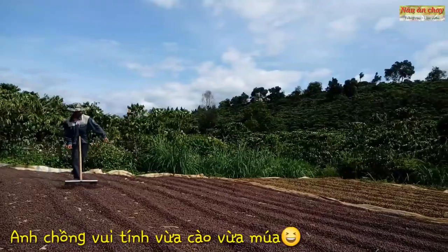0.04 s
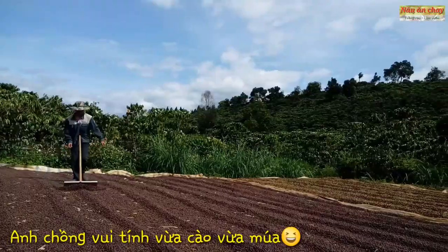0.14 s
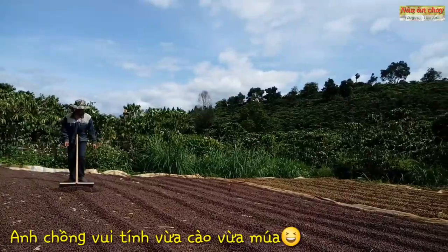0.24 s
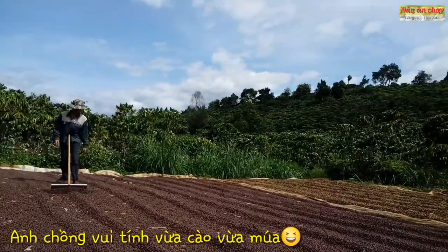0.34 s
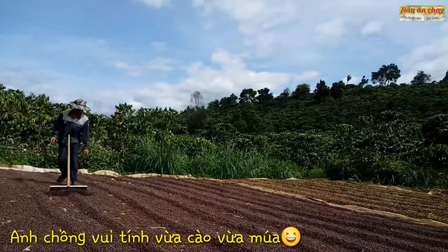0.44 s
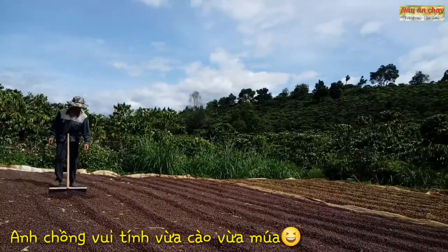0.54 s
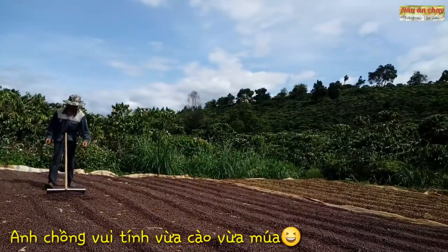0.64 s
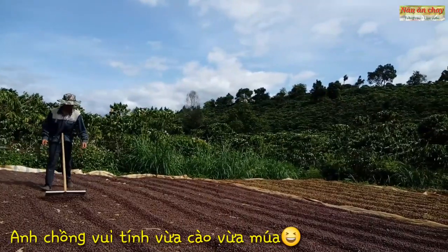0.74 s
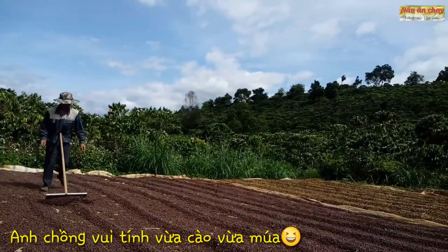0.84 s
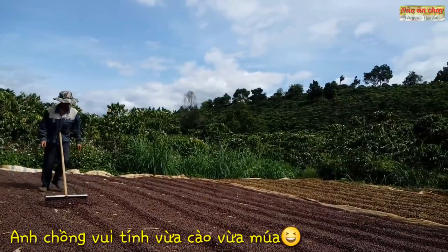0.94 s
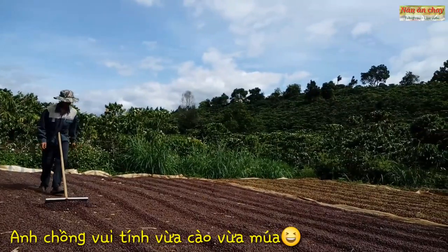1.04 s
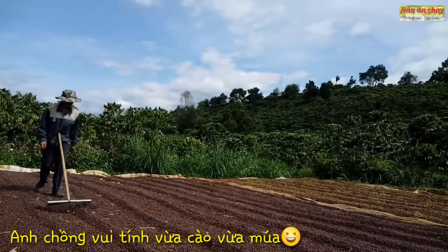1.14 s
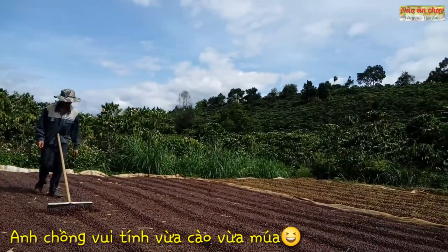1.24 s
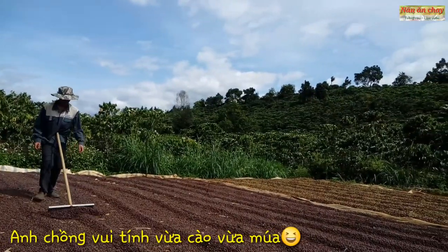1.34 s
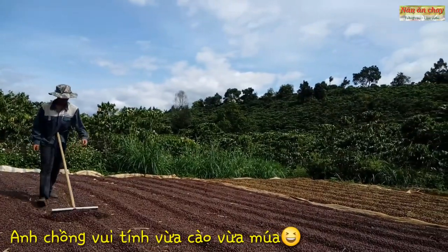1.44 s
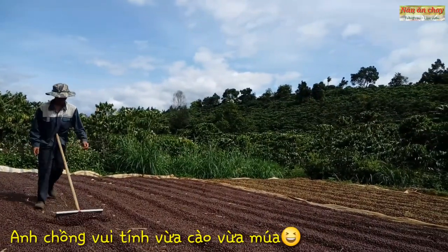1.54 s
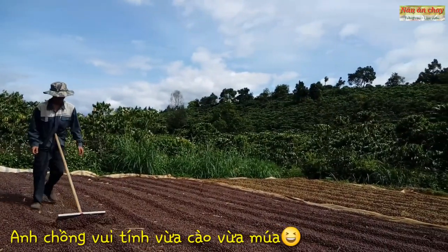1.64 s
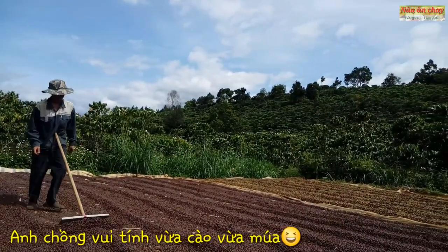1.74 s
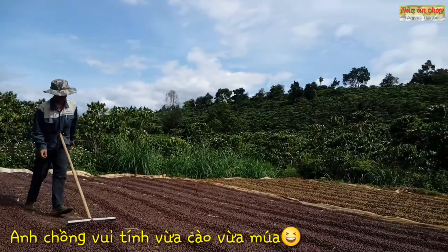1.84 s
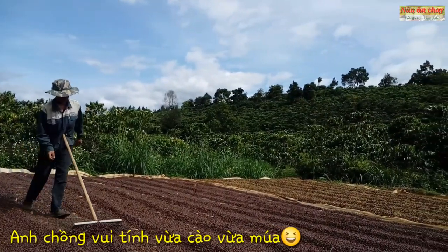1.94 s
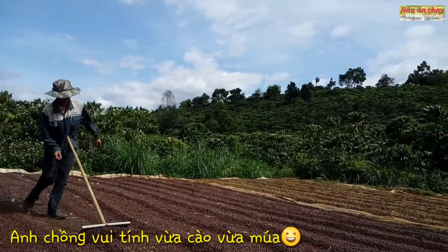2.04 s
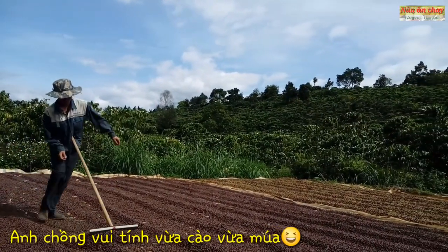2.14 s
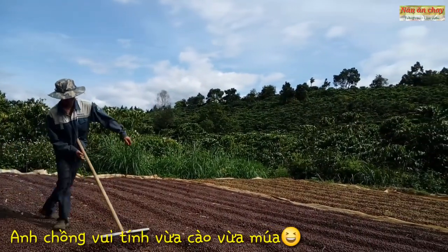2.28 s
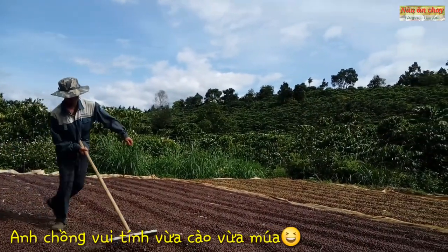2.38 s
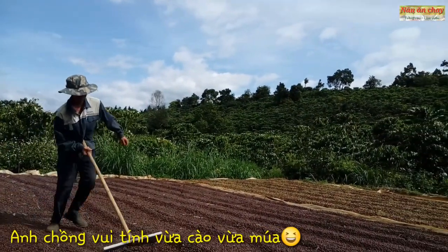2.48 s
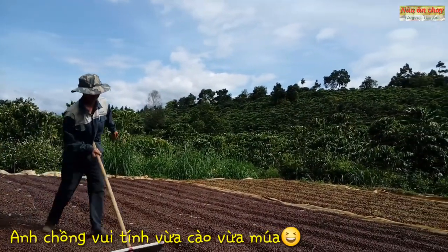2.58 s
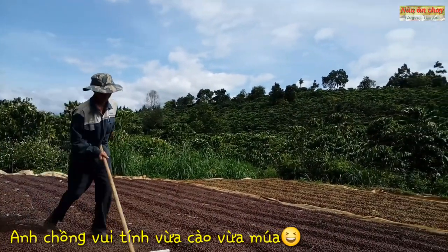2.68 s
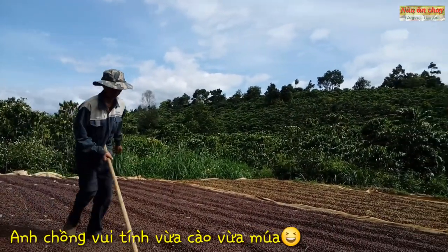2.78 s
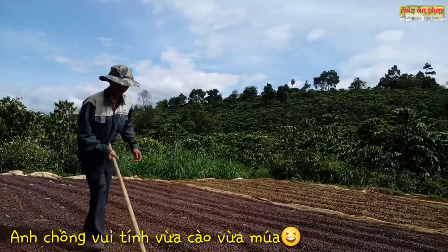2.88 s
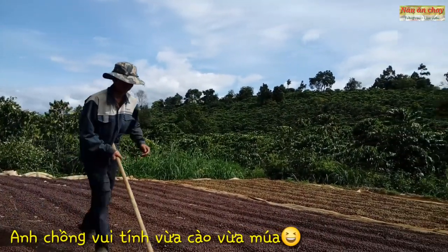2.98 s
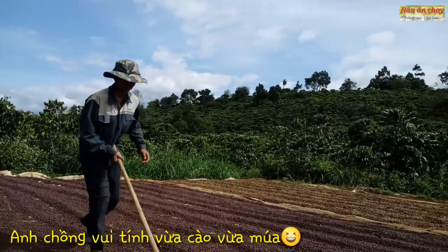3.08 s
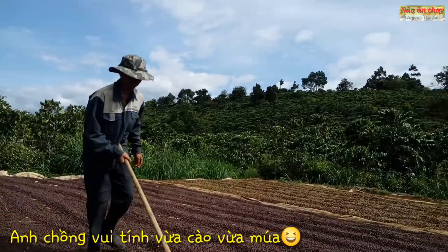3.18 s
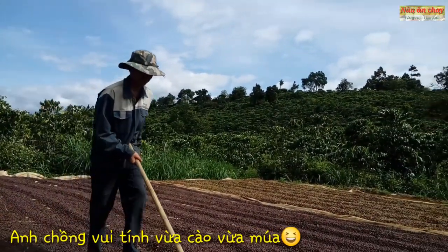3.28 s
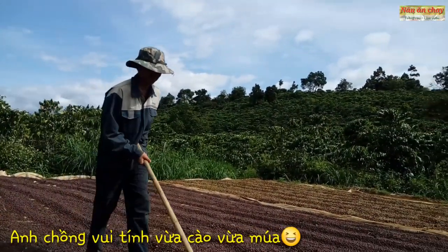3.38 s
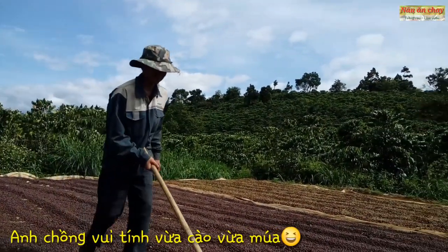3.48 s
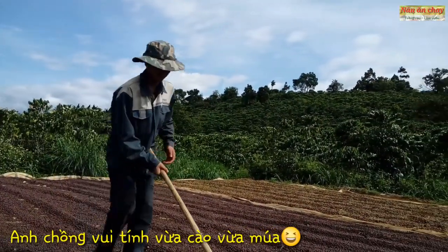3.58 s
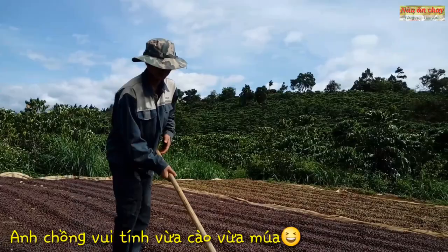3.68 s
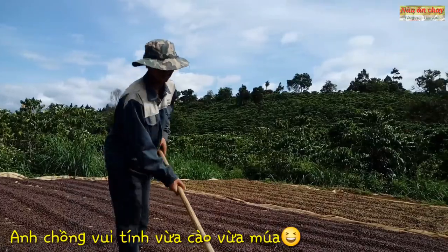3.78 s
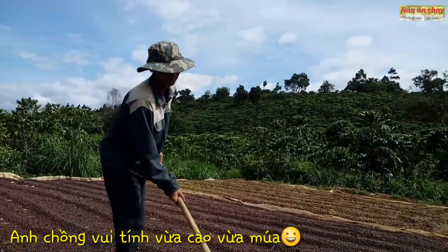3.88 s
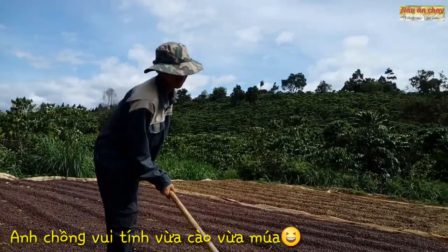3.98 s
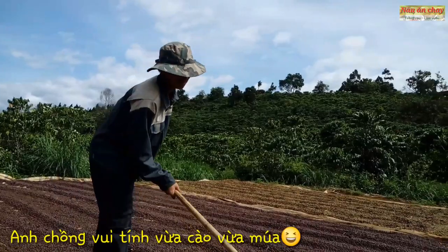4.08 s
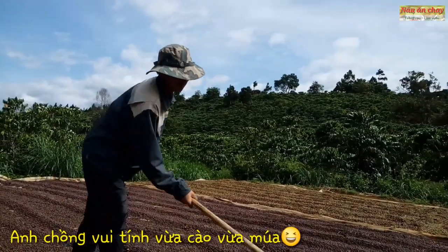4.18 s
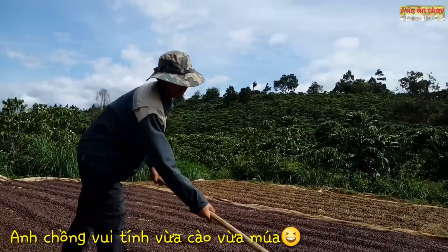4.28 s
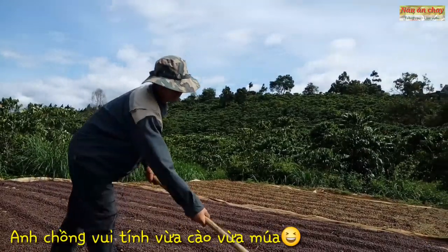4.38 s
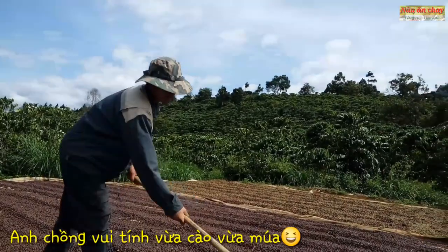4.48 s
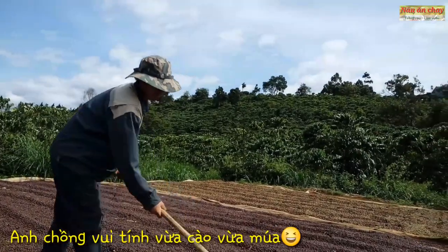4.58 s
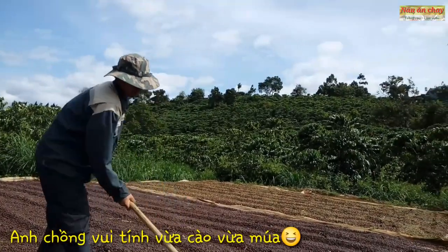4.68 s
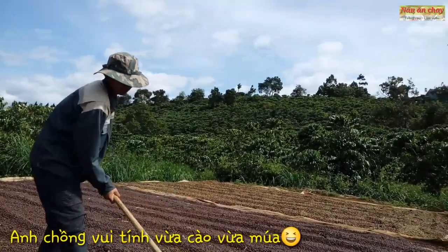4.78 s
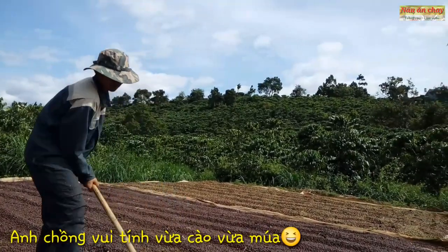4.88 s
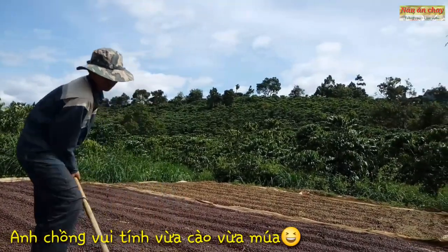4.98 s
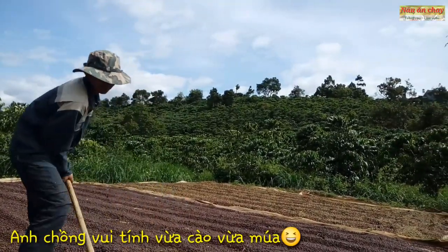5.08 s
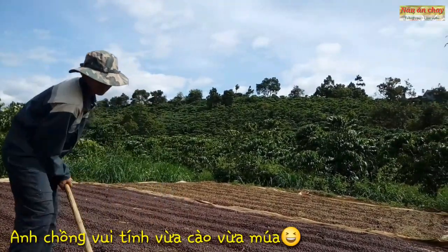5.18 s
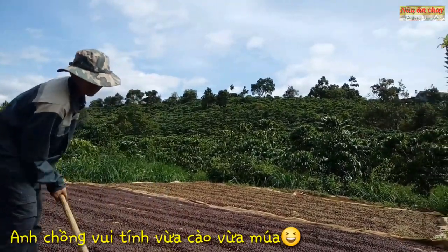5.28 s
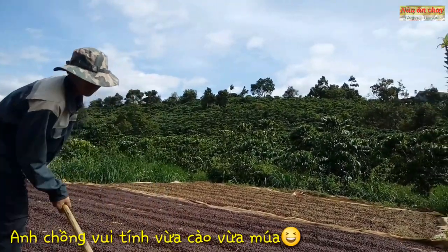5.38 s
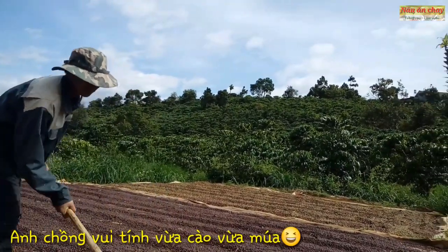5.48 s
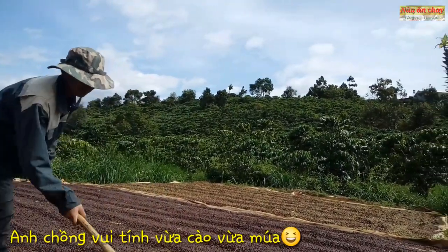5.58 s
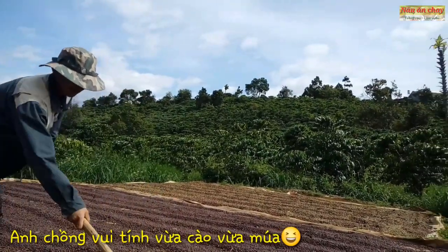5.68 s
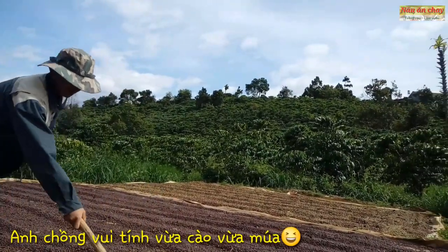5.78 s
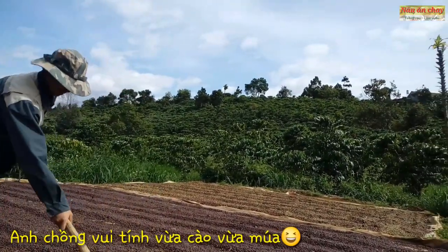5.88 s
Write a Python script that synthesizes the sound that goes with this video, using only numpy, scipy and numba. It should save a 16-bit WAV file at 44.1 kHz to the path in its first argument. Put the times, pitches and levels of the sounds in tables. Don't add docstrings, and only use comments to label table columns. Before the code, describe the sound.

One long rattling scrape of hard, dry shells approaches over nearly four seconds, uneven with each pull. Loose shells tick as they settle, there is a brief lull with a low wind thump, then the rake touches down and makes two short strokes and a final swelling one. Open air, phone-like microphone, quiet leaves and distant hum, no reverberation.

```python
import sys
import numpy as np
from scipy import signal
from scipy.fft import rfft, irfft
from scipy.io import wavfile
from scipy.ndimage import uniform_filter1d
from numba import njit

SR = 44100
rng = np.random.default_rng(int(sys.argv[2]) if len(sys.argv) > 2 else 0)


def wav_out(sig):
    wavfile.write(sys.argv[1], SR, np.round(np.clip(np.atleast_2d(sig).T, -1, 1) * 32767).astype(np.int16))


def how_loud(loudness_db):
    steps = np.asarray(loudness_db, float) / 20
    return 10 ** steps


N = 261513

# [f/Hz, level/dB per Hz]
FARM_SPECTRUM = [(59, -62), (100, -19), (129, -23), (305, -16), (445, -5), (549, -7), (1440, -6.5),
                 (1670, -11), (2390, -6), (7140, -26), (15200, -19)]
FARM_DB = -58
# [f/Hz, level/dB per Hz]
WIND_SPECTRUM = [(8.8, -44), (15, -9.5), (64, 5.5), (123, -2.5), (167, -15.5), (212, -20), (260, -9.5),
                 (340, -42), (570, -120)]
# [t/s, peak level/dB, length/s]
GUSTS = [(.07, -51, .04), (0.181, -37, 0.021), (0.294, -50, .03), (.4, -50, 0.023), (0.526, -38.5, 0.066),
         (.75, -45, .1), (0.893, -32.5, 0.079), (1.07, -35, 0.043), (1.203, -41, 0.034),
         (1.365, -43, 0.027), (1.45, -40, 0.027), (1.6, -39, 0.08), (1.773, -40.5, .06),
         (1.972, -53, 0.042), (2.114, -55, .04), (2.397, -44, 0.046), (2.558, -36, .025), (2.72, -52, .06),
         (2.872, -36.5, 0.02), (2.984, -35.5, 0.048), (3.1, -30, 0.021), (3.21, -40, .04),
         (3.332, -55, 0.072), (3.58, -58, 0.033), (3.725, -49, .03), (4.236, -43, 0.026),
         (4.295, -49, 0.028), (4.568, -54, .02), (5.55, -61, .1), (5.907, -63, .04)]
LULL_DB = -66
# [t/s, peak level/dB, f/Hz]
THUMPS = [
    (0.42, -30, 110),
    (2.8, -44, 90),
    (4.175, -45, 75),
    (4.228, -32, 122),
    (4.223, -34, 210),
    (3.7, -45, 62),
    (4.262, -62, 250),
]
# [t/s, length/s, f/Hz, rise/Hz per s, level/dB]
SQUEAKS = [
    (4.13, 0.15, 2435, 486, -57.5),
    (5.7, 0.164, 2300, 130, -47),
    (5.66, 0.15, 1190, 50, -40),
]
SQUEAK_ATTACK_S, SQUEAK_FADE_DB_PER_S = 0.014, 300

# [t/s, peak level/dB, f/Hz, ring/s, share of rustle/0-1]
SETTLING = [(3.730, -21, 4300, 0.0011, 1), (3.9655, -25, 2570, 0.0033, .9), (4.0, -37, 1410, 0.024, 0.2),
            (4.014, -38, 2700, .006, .6), (4.022, -32, 3440, .008, .6), (4.04, -54, 7500, .01, .2),
            (4.060, -46, 5230, 0.034, .6), (4.061, -47, 6500, 0.02, .3), (4.062, -50, 7600, .015, .3),
            (4.063, -41, 2900, .006, .5), (4.095, -43, 3560, 0.036, .3), (4.123, -37, 2000, .003, .9),
            (4.135, -38, 3620, .004, 0.7), (4.155, -45, 3480, 0.018, .2), (4.145, -44, 4300, .006, .6),
            (4.165, -57, 5600, 0.013, .3), (4.175, -52, 5300, 0.005, .6), (4.184, -51, 8500, .0015, .5),
            (4.191, -47, 8300, .0015, .5), (4.199, -53, 8000, .0015, .8), (4.236, -60, 5000, .002, .8)]
# [t/s, peak level/dB, f/Hz, ring/s, share of rustle/0-1]
TOUCH = [
    (4.4762, -21, 3770, 0.0014, 0.31),
    (4.4768, -33, 2920, .0015, .7),
    (4.4772, -32, 2100, .0015, .9),
    (4.486, -45, 3600, 0.013, .9),
]

# [lands t/s, slows t/s, rattle level/dB at landing, rattle level/dB at slowing, dying/dB per s]
STROKES = [
    (-.1, 3.75, -31.5, -20.5, 70),
    (4.509, 5.265, -26.5, -25, 89),
    (5.289, 5.552, -24, -20, 52.5),
    (5.858, 6.25, -23.5, -11.5, 197.5),
]
BITES = [.01, .007, 0.047, 0.0042]
LIFT_S, LIFT_DB_PER_S = 4.005, 52
# [t/s, extra level/dB, length/s]
TUGS = [(0.208, 2.5, 0.056), (0.499, 4, 0.14), (0.896, 3, 0.13), (1.287, 2, .1), (1.64, 2.4, 0.12),
        (1.929, -2, 0.076), (2.099, 1.8, 0.069), (2.481, 1.94, 0.081), (2.776, 3.5, 0.14),
        (2.975, -1.5, 0.065), (3.236, 2.5, .13), (3.573, 2.5, 0.14), (4.525, 6, .027), (4.729, 3.5, 0.11),
        (5.427, 1.5, 0.072), (5.834, -1.5, 0.018), (4.012, -1.5, 0.049), (4.065, -2, .012),
        (4.133, 3, 0.016)]
# [t/s, nearness/0-1, heap before the board/0-1, handle turned across/0-1, loose shells/0-1]
POSTURE = [(.5, 0.02, 0.23, 0.04, 0.25), (1.2, 0.06, .7, 0, 0.02), (1.8, 0.23, 1, 0.02, .1),
           (2.3, 0.4, .8, 0, 0), (2.8, 0.43, 0.3, 0, 0.35), (3.3, 0.72, 0.45, 0.02, 0),
           (3.6, 0.83, 0.22, 0.67, 0), (3.9, 0.86, 0.48, 0.95, 0.88), (4.1, .95, .6, 0.9, 0),
           (4.52, 1, -.1, 1, 1), (4.8, 1, -.15, .85, 0.2), (4.97, 0.83, 0, 0.65, 0.4),
           (5.15, 0.8, 0.38, 0.43, 0.74), (5.35, 0.85, 1, 0.14, 0.63), (5.6, 1, 0.64, 0.2, 0.44),
           (5.7, 1, -.4, 0.88, 1), (5.85, .9, -.3, 0.9, 0.7), (5.88, 0.7, 0.75, 0.9, 0.67)]

# [f/Hz, level/dB per Hz]
SHELL_SPECTRUM = [(71, -29), (120, -15), (173, -12), (474, -3.5), (546, -6), (629, -3), (818, -4),
                  (1000, -4.5), (1630, -2.5), (3430, 0.5), (4840, -4), (6820, -9), (9620, -16),
                  (11300, -24), (15000, -57)]
FULL_RATE, FULL_DB = 5000, -23.5
TARP_HEAP_DB, BOARD_HEAP_DB = 5, 2.5
TARP_NEAR_DB, BOARD_NEAR_DB = -2, 2.5
SIZZLE_DB, CRISP_DB = 9, 2.5
FACES_S, FACING_TAKES_S = 5, 0.46

# [far f/Hz, near f/Hz, far gain, near gain, gain added by a hard pull]
HOLLOWS = [(878, 1080, 0.9, 0.62, 0.44), (1410, 1420, 0.61, 0.56, -0.54), (2220, 2740, 0.49, 0.64, -0.39),
           (3100, 3630, 0.55, 0.062, 0.62), (4110, 5000, .2, 0.34, 0.79), (5450, 6020, .85, 0, 0.55),
           (2670, 2670, -0.74, 0.12, 0.54), (630, 650, -0.13, -0.16, 0.74),
           (3400, 4190, 0.087, 0.33, -0.19), (710, 850, -0.065, -0.28, 0.037)]
HOLLOW_WIDTH_HZ, WIDTH_SHARE = 110, 0.03
HARD_DB, HARD_SPAN_DB = -23.5, 3.5
TURN_SPOILS = 0.93

# [lag/ms facing the phone, gain facing, lag/ms turned across, gain turned]
BOUNCES = [(.94, 0.21, 0.708, 0.39), (1.23, 0.074, 1.53, -0.072), (2.25, 0.071, 2.1, -.15)]
# [lag/ms, gain]
CASE_EDGES = [(0.198, 0.16), (0.286, -0.074), (0.439, 0.0075), (0.579, -0.019)]


def unit(x):
    return x / np.sqrt(np.mean(x ** 2))


def band(x, lo_hz, hi_hz):
    sos = signal.butter(1, [lo_hz, min(hi_hz, SR / 2.1)], "band", fs=SR, output="sos")
    return signal.sosfilt(sos, x)


def dull(x, hz):
    return signal.sosfiltfilt(signal.butter(2, hz, fs=SR, output="sos"), x)


def colour(x, points):
    hz, db = np.transpose(points)
    size = 2 ** 13
    grid_hz = np.arange(size // 2 + 1) * SR / size
    gain = how_loud(np.interp(np.log(grid_hz + 1), np.log(hz), db))
    cepstrum = irfft(np.log(gain))
    cepstrum[1:size // 2] *= 2
    cepstrum[size // 2 + 1:] = 0
    impulse = irfft(np.exp(rfft(cepstrum)))
    return signal.fftconvolve(x, impulse)[:N]


def walk(rate):
    hold = int(SR / rate)
    steps = np.repeat(rng.standard_normal(N // hold + 1), hold)
    return unit(uniform_filter1d(uniform_filter1d(steps, hold), hold)[:N])


def bump(s, length_s):
    return np.exp(-((np.arange(N) / SR - s) / length_s) ** 2)


def late(x, lag_ms):
    return np.interp(np.arange(N) - lag_ms * SR / 1000, np.arange(N), x)


def curves(table):
    s, *columns = np.transpose(table)
    return [np.interp(np.arange(N) / SR, s, column) for column in columns]


def knocks(rate, spread_db):
    share = np.clip(rate / SR, 1 / SR, 1)
    when, sign = rng.random(N), rng.standard_normal(N)
    rarity = np.minimum(rng.exponential(size=N), 4.5)
    size = how_loud(spread_db * rarity)
    return (when < share) * sign * size / np.sqrt(share * np.mean(size ** 2))


def farm():
    return unit(colour(rng.standard_normal(N), FARM_SPECTRUM)) * how_loud(FARM_DB)


def wind():
    t = np.arange(N) / SR
    lumps = 1.1 * knocks(np.full(N, 150.), spread_db=-0.5) + rng.standard_normal(N)
    blowing = how_loud(LULL_DB + 3.0 * walk(5.7))
    blowing = blowing + sum(how_loud(db) * bump(s, length_s) for s, db, length_s in GUSTS)
    out = unit(colour(lumps, WIND_SPECTRUM)) * blowing
    for s, db, hz in THUMPS:
        turns = np.maximum(t - s, 0) * hz
        out = out + how_loud(db + 5.5) * turns * np.exp(-turns / 0.73) * np.sin(2 * np.pi * turns)
    return out


def squeak(row):
    s, length_s, hz, rise_hz, db = row
    t = np.arange(N) / SR - s
    fade = how_loud(-SQUEAK_FADE_DB_PER_S * np.maximum(t - length_s, 0))
    on = np.clip(t / SQUEAK_ATTACK_S, 0, 1) * fade
    flutter = how_loud(3.0 * walk(90))
    hz = (hz + rise_hz * np.clip(t, 0, length_s)) * (1 + .006 * walk(80))
    return np.sqrt(2) * on * how_loud(db) * flutter * np.sin(2 * np.pi * np.cumsum(hz) / SR)


def drops(table, top_hz):
    t = np.arange(3000) / SR
    out = np.zeros(N + len(t))
    landing = 1 - np.exp(-t / 0.00046)
    noises = rng.standard_normal((len(table), 2, len(t)))
    for (s, db, hz, ring_s, rustle), (roll, scrape) in zip(table, noises):
        ring = np.sin(2 * np.pi * hz * t) + 5.8 * band(roll, .97 * hz, 1.03 * hz)
        scrape = band(band(scrape, 500, top_hz), 500, top_hz)
        tarp = 1.1 * rustle * scrape * np.exp(-t / 0.0023)
        start = int(s * SR)
        out[start:start + len(t)] += how_loud(db) * (ring * np.exp(-t / ring_s) + tarp) * landing
    return dull(dull(out[:N], top_hz), top_hz)


def effort():
    t, level = np.arange(N) / SR, 1e-9
    for (lands, slows, db0, db1, die_db), bite_s in zip(STROKES, BITES):
        distance = np.interp(t, [lands, slows], [how_loud(-db0), how_loud(-db1)])
        dying = how_loud(-die_db * np.maximum(t - slows, 0))
        level = np.hypot(level, np.clip((t - lands) / bite_s, 0, 1) * dying / distance)
    before_second = t < STROKES[1][0]
    lifted_db = -LIFT_DB_PER_S * np.maximum(t - LIFT_S, 0) * before_second
    tugs_db = sum(db * bump(s, length_s) for s, db, length_s in TUGS)
    return 20 * np.log10(level) + lifted_db + tugs_db


def cherries(rattle_db, near, heap, loose):
    near, heap, loose = near - .5, heap - .5, loose - .3
    tarp_db = TARP_HEAP_DB * heap + TARP_NEAR_DB * near
    board_db = BOARD_HEAP_DB * heap + BOARD_NEAR_DB * near
    facing = np.clip((np.arange(N) / SR - FACES_S) / FACING_TAKES_S, 0, 1)
    crisp_db = CRISP_DB * (facing - .2)
    rate = FULL_RATE * how_loud(.8 * (rattle_db - FULL_DB))
    hard = knocks(.3 * rate, spread_db=-1.5)
    surge, out = walk(20), 0
    regions = np.log([600, 1050, 2700, 5500, 8000])
    for hz in 120 * 2 ** np.arange(0, 7.1, .5):
        tarp, board, _, crisp, sizzle = [np.interp(np.log(hz), regions, row) for row in np.eye(5)]
        tilt_db = tarp * tarp_db + board * board_db + crisp * crisp_db + sizzle * SIZZLE_DB * loose
        stirred = knocks(rate * min(hz / 2500, 1.5), spread_db=-0.14) + 0.21 * hard
        swell = how_loud(tilt_db + 0.25 * surge + 0.14 * walk(12))
        out = out + swell * band(stirred, hz / 1.248, hz * 1.287)
    out = colour(out, SHELL_SPECTRUM)
    rattle = signal.sosfilt(signal.butter(4, [2700, 6000], "band", fs=SR, output="sos"), out)
    stirring = rattle_db > -70
    return out * how_loud(rattle_db) * stirring / np.std(rattle[stirring])


@njit
def hollow(x, hz, width):
    y, ring, low = np.empty(len(x)), 0., 0.
    for i in range(len(x)):
        g, damping = np.tan(np.pi * hz[i] / SR), width / hz[i]
        v = (ring + g * (x[i] - low)) / (1 + g * (g + damping))
        ring = 2 * v - ring
        low = low + 2 * g * v
        y[i] = damping * v
    return y


def hollows(rake, rattle_db, near, turned):
    hard = (1 - TURN_SPOILS * turned) / (0.5 + np.exp(-(rattle_db - HARD_DB) / HARD_SPAN_DB))
    for far_hz, near_hz, far_gain, near_gain, hard_gain in HOLLOWS:
        gain = far_gain + (near_gain - far_gain) * near + hard_gain * hard
        width_hz = HOLLOW_WIDTH_HZ + WIDTH_SHARE * far_hz
        rake = rake + gain * hollow(rake, far_hz + (near_hz - far_hz) * near, 1. * width_hz)
    return rake


def reflections(rake, turned):
    soft, softer = dull(rake, hz=7800), dull(rake, hz=2800)
    for (lag, gain, lag_turned, gain_turned), sound in zip(BOUNCES, (soft, soft, softer)):
        moving_gain = gain + (gain_turned - gain) * turned
        rake = rake + 0.56 * moving_gain * late(sound, lag + (lag_turned - lag) * turned)
    return rake + sum(gain * late(soft, lag) for lag, gain in CASE_EDGES)


def scene():
    background = farm() + wind() + sum(map(squeak, SQUEAKS))
    near, heap, turned, loose = curves(POSTURE)
    rattle_db = effort()
    rake = cherries(rattle_db, near, heap, loose)
    rake = hollows(rake, rattle_db, near, turned)
    rake = rake + drops(SETTLING, top_hz=11000) + drops(TOUCH, top_hz=5600)
    rake = reflections(rake, turned)
    return np.tile(how_loud(-1.63) * rake + background, (2, 1))


def low_pass(x):
    return signal.sosfilt(signal.butter(12, 15380, fs=SR, output="sos"), x)


def record(dry):
    heard = signal.sosfilt(signal.butter(1, 45, "high", fs=SR, output="sos"), dry)
    return low_pass(heard)


dry = scene()
out = record(dry)
wav_out(out)
```